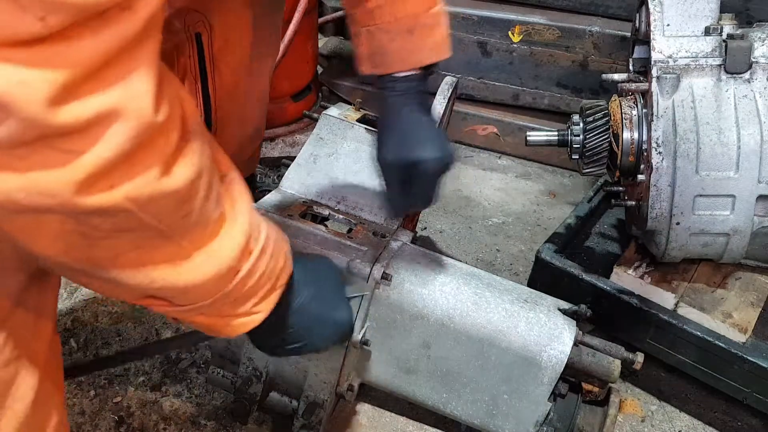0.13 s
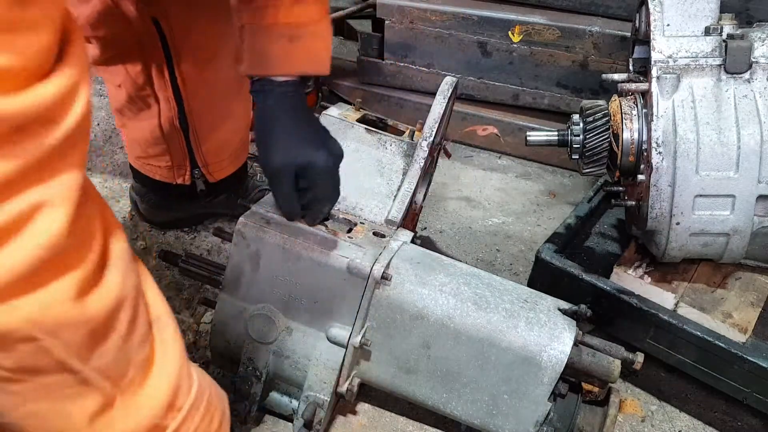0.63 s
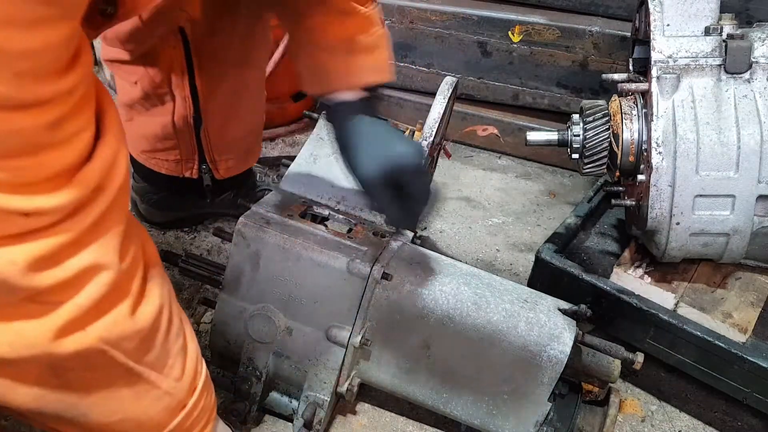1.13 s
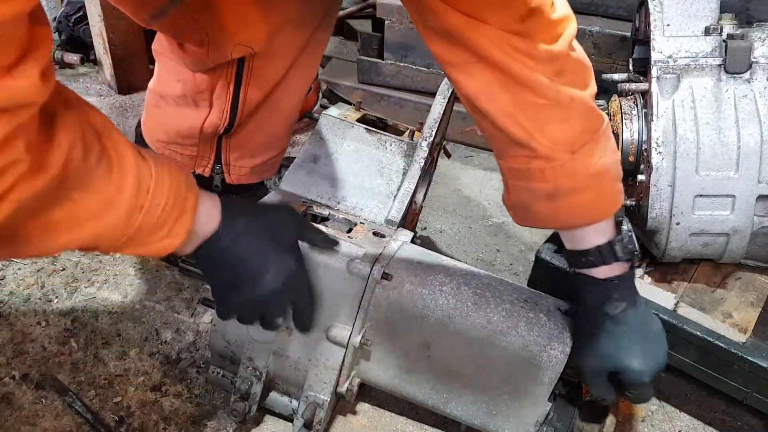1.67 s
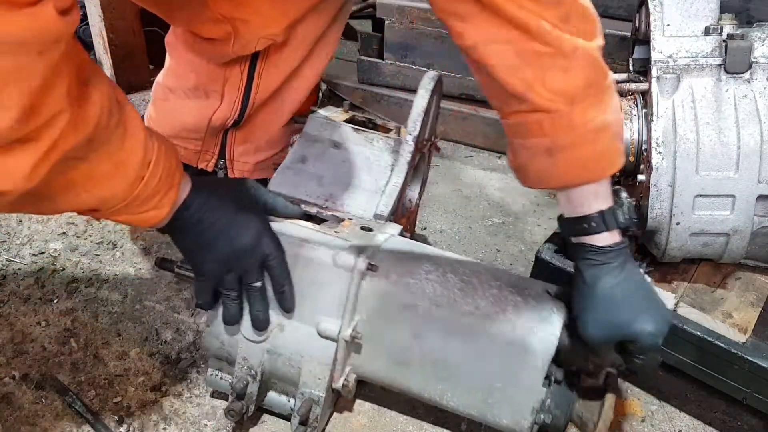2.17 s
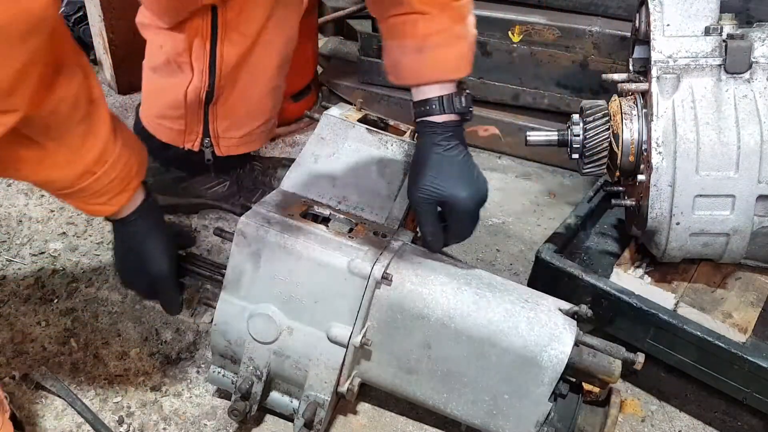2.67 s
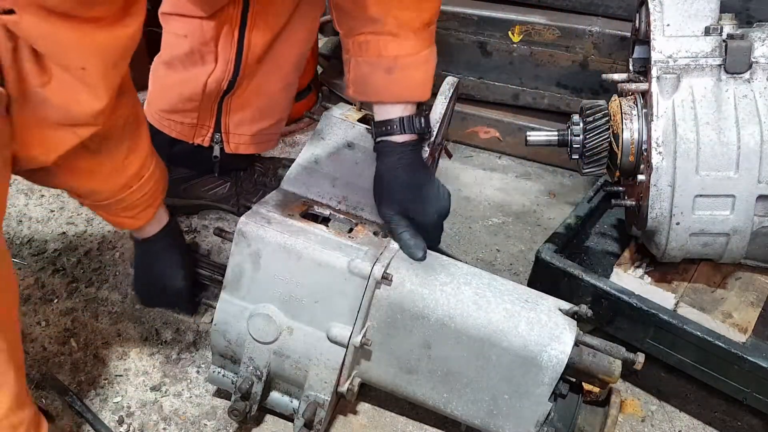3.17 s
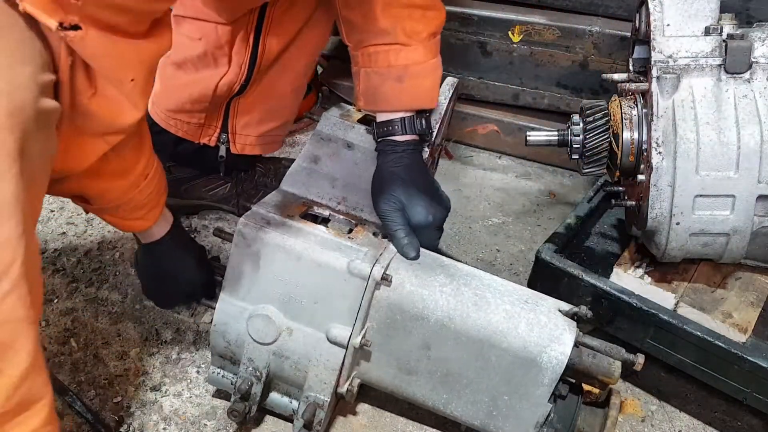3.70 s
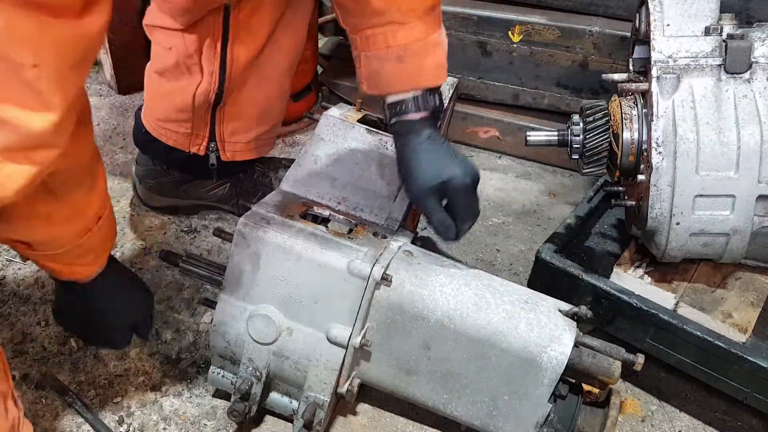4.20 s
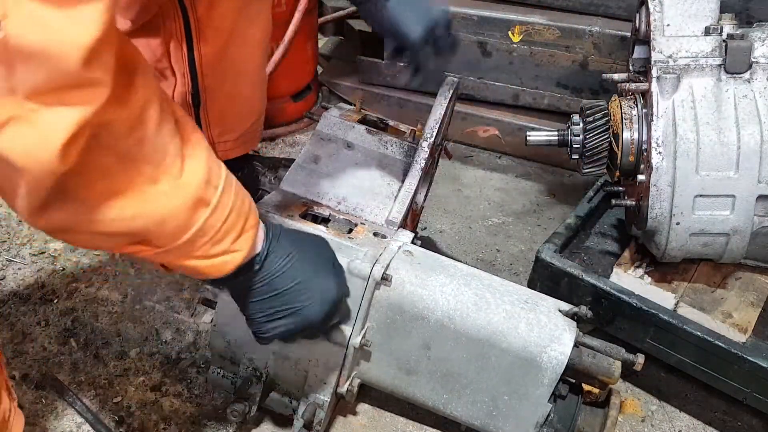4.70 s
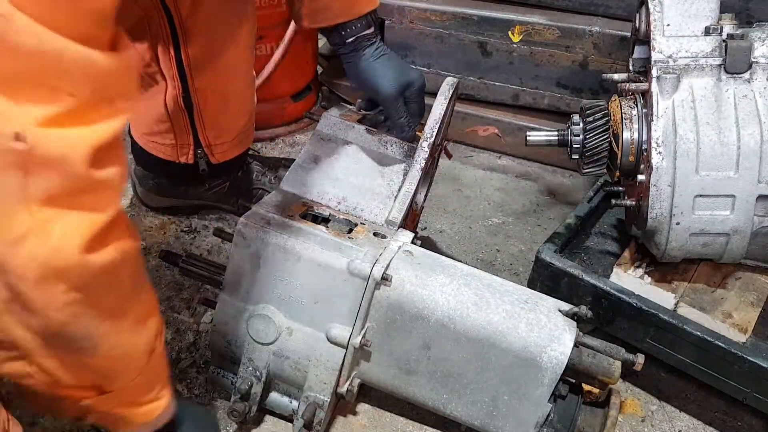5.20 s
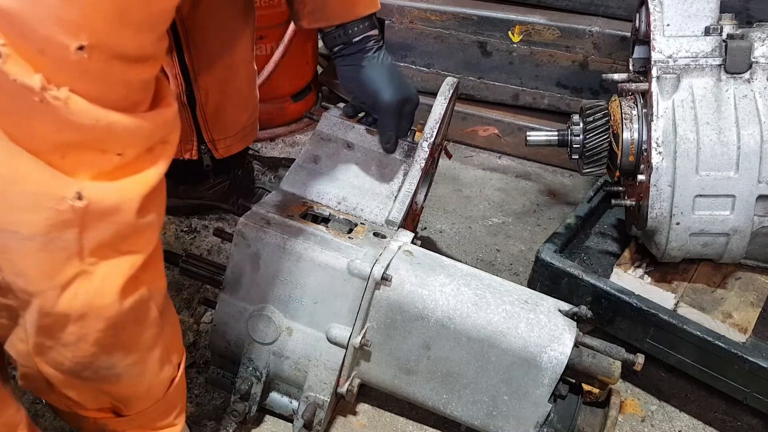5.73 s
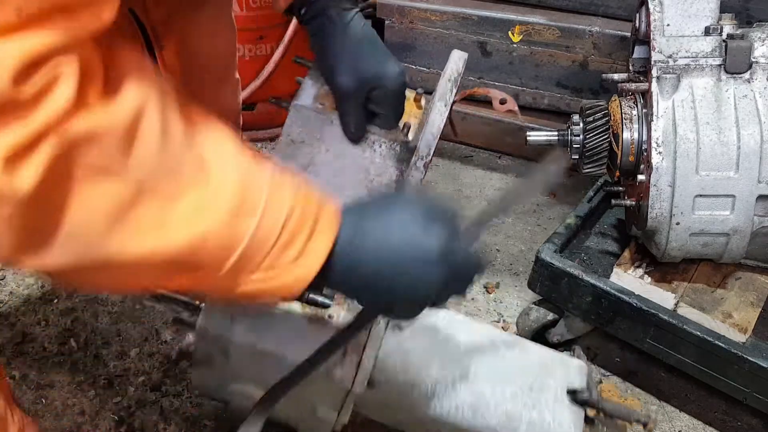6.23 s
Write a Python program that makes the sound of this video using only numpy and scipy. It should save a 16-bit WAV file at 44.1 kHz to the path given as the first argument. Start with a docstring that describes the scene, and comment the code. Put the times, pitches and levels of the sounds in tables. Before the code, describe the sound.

Bright clanking of a bar settling on concrete, followed by deep casing thuds, glove rustle and small ticks, heard close up.

```python
"""A steel pry bar is laid down on a workshop floor, bounces, rolls and rings out; later it is picked up again.
The bar is a bank of sine modes shared out anew at each contact, with noise clicks on top.
A heavy cast casing is tipped and thuds down: damped modes, a push and a noise crack.
Overalls and gloves rustle as grainy noise, small things tick as resonant bursts, a rubbed metal ring is faint,
and filtered noise rumbles low in the workshop, all close to a two-microphone phone."""
import sys
import numpy as np
from scipy import signal
from scipy.fft import rfft, irfft
from scipy.io import wavfile
from scipy.ndimage import uniform_filter1d

SR = 44100
rng = np.random.default_rng(int(sys.argv[2]) if len(sys.argv) > 2 else 0)


def master_out(mix):
    """Clip the mix to full scale and print it as 16-bit PCM to the path in sys.argv[1]."""
    frames = np.transpose(np.atleast_2d(mix))
    ceiling = np.clip(frames, -1, 1)
    pcm = np.round(ceiling * 32767).astype(np.int16)
    wavfile.write(sys.argv[1], SR, pcm)


def amplitude_ratio(level_db):
    """Convert a level in decibels to the matching linear amplitude (field) ratio."""
    exponent = np.asarray(level_db, float) / 20
    return 10 ** exponent


N = 280476
T = np.arange(N) / SR


def colour(points, shape=N):
    """Unit noise with a spectrum drawn through (Hz, dB) points."""
    hz, db = np.transpose(points)
    f = np.fft.rfftfreq(N, 1 / SR) + 1
    gain = amplitude_ratio(np.interp(np.log(f), np.log(hz), db, left=-90, right=-90))
    y = irfft(rfft(rng.standard_normal(shape)) * gain, N)
    return y / y.std()


def diffuse(points):
    """Two-channel noise, nearly alike in the bass and unrelated in the treble."""
    mid, side = colour(points, (2, N))
    alike_hz = 550  # below this both microphones hear much the same
    side = 0.12 * side + signal.lfilter(*signal.butter(1, alike_hz, "high", fs=SR), side)
    return mid + side * np.array([[1], [-1]])


def walk(rate, count=1):
    """Random levels held 1 / rate s and slewed twice; spread near 1."""
    k = int(SR / rate)
    held = np.repeat(rng.standard_normal((count, N // k + 1)), k, axis=1)[:, :N]
    return 1.27 * uniform_filter1d(uniform_filter1d(held, k), k)


def curve(rows, column=1):
    """Gain over time from a table of (s, dB) breakpoints."""
    rows = np.array(rows)
    return amplitude_ratio(np.interp(T, rows[:, 0], rows[:, column]))


def swell(s, length):
    """Gain that rises from time s and falls again within length s, peaking before its middle."""
    skew = 0.77
    return np.sin(np.pi * np.clip((T - s) / length, 0, 1) ** skew) ** 2


def add(out, s, sound):
    """Mix a sound in from time s."""
    i = int(s * SR)
    out[..., i:i + sound.shape[-1]] += sound[..., :N - i]


def bar():
    """Steel bar modes: every contact shares the ring out anew over them, with a knock and a click."""
    # bar modes, plus a faint tone at twice 2295 Hz (4590): f/Hz
    mode_hz = [431, 1174, 1217, 2207, 2295, 3205, 3410, 3811, 4170, 4590, 4670, 4685, 5775, 6110, 7120,
               7187, 7790, 8335, 9658, 10130, 11490, 11670, 12320, 13540, 13990, 14640, 15170]
    # the same modes: level/dB, t60 at damping factor 1/s, gain by place/dB, gain by roll/dB,
    # gain by point contact/dB, left minus right/dB, left leads/rad
    modes = [(-24, 0.25, -19, 14, 7, -1.9, -0.96), (-15, 0.86, -15, 10.5, 2.5, -3.9, 0.37),
             (-17, 0.52, -10, 10.5, -2, -2, -2.6), (-9.5, 0.63, -0.2, 8.5, -3, -3.5, -2),
             (-6.5, 0.75, 28, 11.5, -14, -3, 0.83), (-6.0, 0.2, 0.5, -9.5, -11, 7, -2.5),
             (-3, 0.56, -14, 1, -0.6, 3, -1.05), (-25, 0.44, -6, 19.5, 3.5, 9, -2.3),
             (-7, 0.45, -6.5, -13, -3.5, -7.5, -1), (-33.0, 0.91, 26, 11, -8, -0.5, 0.5),
             (1.5, 0.3, -3, -4, 4.3, 5, 2.1), (-23, 0.91, 26.5, 10.0, -10.5, -0.5, 2.1),
             (-9.5, 0.15, -1, -15, -4, -0.6, 1.44), (-0.5, 0.3, 17.5, -4.5, 5.5, 9, 3),
             (-7.5, 0.14, 2, -6, 2.5, -0.5, -3.5), (-14, 0.39, 4.5, -5, -2, 9, 2),
             (-3.5, 0.24, -5, -4.5, 5.5, 1.5, 2), (-11, 0.56, -8, 1, -1, -5.5, 3.5),
             (-10, 0.44, -6, -3.6, 12.5, -3, -1.5), (-14, 0.3, -1.5, -6, 1.35, 4, -1),
             (-19.5, 0.55, 7.5, 11.5, 3, 0.5, -2.2), (-11, 0.47, -14, 1.5, 15.5, 1.5, -2.74),
             (-14, 0.33, -7.5, 11.5, 14, 6, 3), (-14, 0.28, 3.1, 10, 7.5, 2.5, 1),
             (-13.5, 0.33, -6.5, 8.5, 7, 7, -0.3), (-20, 0.41, -6, 9, 11, 6, 1.66),
             (-26, 0.55, 0, 11.5, 5, 4, -0.16)]
    # the bar strikes the floor or the casing: t/s, level/dB, place along the bar (within -1..1),
    # roll (about -1.2..1), point contact (about -1.1..0.7), damping factor
    bounces = [(0.24, -51, -0.34, 0.15, -0.41, 3.6), (0.8427, -29, -0.17, 0.032, 0.67, 1.46),
               (0.897, -37.5, -0.17, -0.49, 0.53, 1.6), (0.9769, -42.5, -0.16, 0.14, 0.57, 1.36),
               (1.0426, -32.5, -0.38, 0.33, -0.58, 1.2), (1.1174, -24, 0.04, -0.12, -1.04, 0.35),
               (1.1678, -17, -0.23, -0.83, -0.084, 1.26), (1.287, -24, 0.24, -0.55, -0.03, 0.23),
               (5.53, -52, -0.4, 0.4, -0.46, 1.9), (5.602, -56.5, -0.6, 1, -0.78, 2.6),
               (5.627, -46.5, -0.94, 0.78, -0.99, 2.6), (5.664, -50.5, 0.14, -0.015, 0.43, 1.9),
               (5.727, -54, -0.074, -0.36, 0.28, 4.7)]
    # the bar rolls onto a new contact without a blow: t/s, level/dB, place (within -1..1),
    # roll (about -1.2..1), point contact (about -1.1..0.7), damping factor
    rolls = [(1.082, -30, 0.05, 0.41, -1, 1.0), (1.215, -26.5, -0.48, -1.18, -1.05, 1.2),
             (1.245, -16, -0.17, -0.71, -0.15, 2.27), (1.334, -27.5, 0.67, -0.24, 0.39, 0.67),
             (1.42, -40, 0.88, -0.14, 0.3, 1.01), (5.507, -40.5, -0.06, -0.23, 0.46, 0.97)]
    bounce_rise_ms, roll_rise_ms = 0.43, 18  # how fast the new ring takes over
    click_db_by_point = 4  # a point contact clicks brighter than a flat one
    beam_hz, beam_power = 4900, 0.45  # higher modes beam more sharply, so they flutter more

    count = len(modes)
    hz = np.array(mode_hz)[:, None]
    mode_db, t60, *by_contact, pan_db, lead = np.array(modes).T[:, :, None]
    moving = np.zeros(N)
    ring = np.zeros((count, N))
    clicks = np.zeros((2, N))
    contacts = [(*row, bounce_rise_ms) for row in bounces] + [(*row, roll_rise_ms) for row in rolls]
    contacts = sorted(contacts)
    ends = [row[0] for row in contacts[1:]] + [N / SR]
    grit = rng.standard_normal((len(contacts), 2, 1200))
    burst_t = T[:1200]
    for (s, db, *contact, damping, rise_ms), end, noise in zip(contacts, ends, grit):
        a = int(s * SR)
        b = int(min(end + 0.2, s + 1.2) * SR)
        t = T[:min(b, N) - a]
        now = slice(a, a + len(t))
        contact_db = sum(c * g for c, g in zip(contact, by_contact))
        new = amplitude_ratio(db + mode_db + contact_db - 60 * t * damping / t60)
        share = 1 - np.exp(-t / (rise_ms / 1000))
        ring[:, now] = share * new + (1 - share) * ring[:, now]
        # a sharp contact sets the bar rocking; it settles soon after
        moving[now] = 0.31 + np.exp(-rise_ms / 25 - t / 0.14)
        knock = signal.lfilter(*signal.butter(1, [200, 1100], "band", fs=SR), noise[0] + 0.19 * noise)
        add(clicks, s, amplitude_ratio(db - 4.5 - 0.8 * rise_ms - 60 * burst_t / 0.14) * knock)
        click = signal.lfilter(*signal.butter(1, [1500, 9000], "band", fs=SR), noise)
        click_db = db + 4.5 + click_db_by_point * contact[2] - 1.2 * rise_ms
        add(clicks, s, amplitude_ratio(click_db - 60 * burst_t / 0.02) * click)

    # the rolling bar turns its loud directions past the two microphones
    moving = uniform_filter1d(moving, 400) * (hz / beam_hz) ** beam_power
    phase = 2 * np.pi * (hz * T + rng.random((count, 1))) + 0.9 * moving * walk(35, count=count)
    turn = 0.44 * moving * walk(8, count=count)
    left_gain = amplitude_ratio(pan_db / 2 + 3.2 * moving * walk(55, count=count))
    right_gain = amplitude_ratio(-pan_db / 2 + 3.3 * moving * walk(55, count=count))
    left = left_gain * np.sin(phase + lead / 2 + turn)
    right = right_gain * np.sin(phase - lead / 2 - turn)
    return np.array([(ring * left).sum(0), (ring * right).sum(0)]) + clicks


def casing():
    """A push rings the casing; it rocks freely for a moment, then the floor damps it; the contact cracks."""
    # casing on the floor: f/Hz, relative level/dB, t60 at damping factor 1/s
    modes_on_floor = [(61.76, 9.5, 0.88), (101.06, 5.5, 0.22), (113.6, 11.5, .3), (131.5, 4, 0.22),
                      (160, 0.5, 0.17), (217.5, 0.5, 0.18), (252.8, -3, 0.23), (329.3, -5, 0.34),
                      (437.2, -7.5, 0.096), (525, -24, .2), (887, -7, .15), (991, -3, 0.23),
                      (1394, -9.5, 0.12), (1422, -10, 0.11), (1872, -9, 0.18), (2193, -10.5, .15),
                      (2410, -9.5, 0.14)]
    # thuds: t/s, body peak/dB, crack against body/dB, grit against body/dB, damping factor
    thuds = [(0.345, -36.5, -10.5, -3.5, 3.4), (0.377, -41.5, -22, -15, 3.3), (0.477, -44, -12, -12, 4),
             (2.055, -23, -21.5, -52, 3.2), (2.135, -23.5, -20.5, -31.5, 3.2),
             (2.291, -14.5, -23, -19, 2.7), (3.632, -11, -15.5, -27, 4.4), (3.709, -34, -41, -36, 1.8),
             (5.885, -42.5, -25.5, -21.5, 3.4), (6.282, -15, -36, -44.5, 2.5)]
    rock_s = 0.031  # the casing rings freely this long before the floor damps it
    push_ms, push_ms_per_db = 1.2, 0.0564  # a softer contact cracks less and pushes longer
    # the weight comes down over the first moments, so the ring starts this much weaker
    settle_share, settle_s = 0.33, 0.008

    out = np.zeros((2, N))
    t = T[:SR // 2]
    hz, mode_db, t60 = np.array(modes_on_floor).T[:, :, None]
    thin = hz > 700  # wall modes answer the crack, not the soft push
    crack_band = signal.butter(2, [450, 1600], "band", fs=SR, output="sos")
    grit_band = signal.butter(1, [1800, 7000], "band", fs=SR, output="sos")
    noises = rng.standard_normal((len(thuds), 2, 2, len(t)))
    spreads = rng.standard_normal((len(thuds), 2, len(modes_on_floor), 1))
    for (s, db, crack_db, grit_db, damping), (crack, grit), spread in zip(thuds, noises, spreads):
        loaded = 0.11 * t + damping * np.maximum(t - rock_s, 0)  # seconds of decay so far
        phase = 2 * np.pi * hz * t + 0.29 * spread[0] + 0.1 * spread
        modes = amplitude_ratio(mode_db - 60 * loaded / t60) * np.cos(phase)
        push = -np.diff(np.hanning(int((push_ms - push_ms_per_db * crack_db) * SR / 1000)))
        settling = 1 - settle_share * np.exp(-t / settle_s)
        body = signal.lfilter(push, 1, (modes * ~thin).sum(1) * settling)
        wall_gain = amplitude_ratio(crack_db - 5.5 - 60 * t / 0.16) * (1 - np.exp(-t / 0.001))
        walls = wall_gain * (modes * thin).sum(1)
        crack = signal.sosfilt(crack_band, crack[0] + 0.37 * crack)
        grit = signal.sosfilt(grit_band, grit)
        crack_decay = amplitude_ratio(-60 * t / 0.0355) + 0.305 * amplitude_ratio(-60 * t / 0.18)
        contact = amplitude_ratio(crack_db + 10) * crack_decay * crack
        contact += amplitude_ratio(grit_db + 3.5 - 60 * t / 0.12) * (1 - np.exp(-t / 0.0042)) * grit
        add(out, s, amplitude_ratio(db) * (body / abs(body).max() + walls + contact))
    return out


def ticks():
    """Short noise bursts around one resonance each; low knocks ring narrower than high ticks."""
    # small ticks and knocks: t/s, nominal peak/dB, centre f/Hz, t60/s, left minus right/dB
    touches = [(0.165, -48.5, 1890, 0.034, -3), (0.313, -35.5, 7960, 0.034, -2),
               (0.6623, -42.5, 7670, 0.039, -1), (2.3015, -32, 1050, 0.054, -0.5),
               (2.5775, -35, 1324, 0.038, 2), (2.606, -38, 1420, 0.028, 0.0),
               (2.7994, -50.5, 7190, 0.026, 4), (3.421, -44, 8900, 0.0435, -3.5),
               (3.4228, -50.5, 1573, 0.063, -1), (4.6068, -52.5, 9230, 0.036, -0.5),
               (4.7027, -48, 2996, 0.046, 4), (5.4841, -39, 5200, 0.021, -1.5),
               (6.321, -36.5, 1450, 0.045, 2)]
    out = np.zeros((2, N))
    t = T[:SR // 8]
    for (s, db, hz, t60, pan_db), noise in zip(touches, rng.standard_normal((len(touches), 2, len(t)))):
        q = 2.5 * (6000 / hz) ** 0.53
        burst = signal.lfilter(*signal.iirpeak(hz, q, fs=SR), noise[0] + 0.78 * noise)
        snap = 0.5 * amplitude_ratio(-60 * t / 0.012) * np.diff(noise, prepend=0)  # the first touch is bright
        pan = np.array([[pan_db], [-pan_db]]) / 2
        add(out, s, amplitude_ratio(db - 3.0 - 60 * t / t60 + pan) * (burst / burst.std() + snap))
    return out


def rustle():
    """Cloth and glove hiss made of dense small grains, under single swishes of the same grain."""
    # steady hiss before graining: t/s, treble level/dB, middle level/dB
    hiss_levels = [(0.0, -67, -69.5), (0.4, -67, -65.5), (0.7, -63, -74.5), (0.9, -70, -65),
                   (1.55, -66.5, -67), (1.75, -68, -74), (2.11, -68, -71.5), (2.3, -65, -67.5),
                   (2.68, -63.5, -65.5), (2.95, -69.5, -77), (3.25, -71.5, -75.5), (3.45, -77.5, -84),
                   (3.79, -81.5, -88), (3.93, -66.5, -81), (4.3, -74, -75), (5.2, -68.5, -71.5),
                   (5.42, -55.5, -60.5), (5.72, -67.5, -67.5), (6.18, -58, -58.5), (6.36, -68, -63.5)]
    # treble spectrum: f/Hz, density/dB per Hz
    treble_colour = [(1470, -32.5), (2500, -4.5), (2970, -8), (4410, -1.5), (6500, -2), (11300, -3),
                     (15200, -5), (16000, -6.5)]
    # middle spectrum: f/Hz, density/dB per Hz
    middle_colour = [(240, -15.5), (400, -10.5), (1040, -3.5), (1740, -2), (2090, -8), (2280, -5),
                     (3500, -11.5), (4550, -36), (7700, -120)]
    grain = amplitude_ratio(1.12 * walk(130) + 1.7 * walk(28))
    treble = curve(hiss_levels, column=1) * diffuse(treble_colour) * grain
    middle = curve(hiss_levels, column=2) * diffuse(middle_colour) * grain * amplitude_ratio(1.93 * walk(34))
    return treble + middle + swishes(grain)


def swishes(grain):
    """Cloth sliding: quick swell, uneven hiss, slower stop."""
    # single swishes before graining: t/s, length/s, treble level/dB, middle against the treble/dB
    slides = [(0.215, 0.16, -51, -5.5), (0.282, 0.117, -50.5, 1), (0.56, 0.13, -59.5, -6),
              (0.717, 0.07, -53.5, -9), (1.498, 0.18, -49.5, -19.5), (1.769, 0.17, -58.5, -10.5),
              (2.172, 0.15, -55, -19), (2.402, 0.19, -46, -21), (2.569, 0.096, -49.5, 3.5),
              (2.641, 0.11, -54, -15), (2.743, 0.13, -59, -11), (2.89, 0.063, -61, -12),
              (2.96, 0.06, -59.5, -14.5), (2.988, 0.12, -52, -28), (3.096, 0.065, -62, -5.5),
              (3.182, 0.1, -54, -17.5), (3.42, 0.063, -63.5, -14.5), (3.882, 0.093, -58.5, -10.5),
              (3.974, 0.087, -61, -17.5), (4.056, 0.11, -60.5, -6.5), (4.41, 0.098, -48.5, -11),
              (4.459, 0.15, -66, 2.5), (4.581, 0.082, -61, -22), (5.171, 0.18, -61.5, -12),
              (5.298, 0.23, -56, -5), (5.482, 0.094, -45, -3.5), (5.822, 0.094, -60, -9),
              (5.985, 0.11, -51, -17.5), (6.064, 0.23, -52.5, -4)]
    presence_share = 0.44  # presence follows the middle by this share
    pan_db = 1  # the cloth is to the left
    gains = np.zeros((3, N))
    for s, length, treble_db, middle_db in slides:
        a, b = int(s * SR), int((s + length) * SR)
        gain = np.zeros(N)
        gain[a:b] = amplitude_ratio(treble_db) * swell(s, length)[a:b]
        gains += gain * amplitude_ratio(np.array([[0], [presence_share * middle_db], [middle_db]]))
    hiss = 0
    # treble, presence and middle
    for gain, edges in zip(gains, ([6200, 14000], [2430, 5600], [650, 2020])):
        sos = signal.butter(2, edges, "band", fs=SR, output="sos")
        band = signal.sosfilt(sos, rng.standard_normal((2, N)))
        hiss = hiss + gain * band / band.std()
    return hiss * grain * amplitude_ratio(np.array([[pan_db], [-pan_db]]) / 2)


def rubbed_ring():
    """A faint metal ring kept alive by rubbing: noise through narrow resonances, in swells."""
    # rubs: t/s, length/s, level at the height of the swell/dB
    rubs = [(2.623, 0.39, -64), (4.739, 0.1, -66), (5.05, 0.15, -67), (5.3, 0.21, -74.5),
            (5.657, 0.77, -59.5)]
    # resonances: f/Hz, width/Hz, relative gain/dB
    resonances = [(1420, 35, 0.5), (1618, 31, 0.5)]
    noise = rng.standard_normal((2, N))
    ring = sum(amplitude_ratio(db) * signal.lfilter(*signal.iirpeak(hz, hz / width, fs=SR), noise)
               for hz, width, db in resonances)
    gain = sum(amplitude_ratio(db) * swell(s, length) for s, length, db in rubs)
    return gain * ring / ring.std()


def rumble():
    """Workshop rumble and handling: low noise that heaves and flutters."""
    # level before the flutter: t/s, level/dB
    levels = [(0.0, -51), (0.12, -59), (1.11, -51), (1.4, -60), (2.05, -63.5), (2.15, -57), (2.58, -57),
              (3.24, -66), (3.6, -59.5), (3.9, -55), (4.59, -54), (5.45, -54.5), (6.3, -54), (6.36, -48)]
    # spectrum: f/Hz, density/dB per Hz
    spectrum = [(15, -42.5), (25, -14), (38, -1.5), (59, 3), (109, -4.5), (165, -5), (297, -9.5),
                (377, -17.5), (438, -16), (798, -25), (900, -29.5), (1170, -44.5), (1980, -120)]
    return curve(levels) * diffuse(spectrum) * amplitude_ratio(2.1 * walk(13))


def room(dry, wet_db):
    """Dense decaying echoes, longer in the bass and wider in the treble."""
    # reverberation time: f/Hz, t60/s
    reverb = [(60, 0.95), (250, 0.46), (1000, 0.35), (4000, 0.25), (14000, 0.067)]
    t = T[:SR]
    hz, t60 = np.transpose(reverb)
    tail = 0
    for centre in 45 * 2. ** np.arange(8.4):
        sos = signal.butter(2, [centre / 1.41, centre * 1.41], "band", fs=SR, output="sos")
        mid, side = signal.sosfilt(sos, rng.standard_normal((2, SR)))
        decay = np.interp(np.log(centre), np.log(hz), t60)
        both = mid + min(0.16 + centre / 1400, 1) * side * np.array([[1], [-1]])
        tail = tail + both * amplitude_ratio(-60 * t / decay) * (1 - np.exp(-t / 0.0025))
    return dry + amplitude_ratio(wet_db) * signal.fftconvolve(dry, tail, axes=1)[:, :N]


def scene():
    """Bar, casing and ticks sound in the room; cloth, rubbing and rumble are added without echoes."""
    return room(bar(), -35.0) + room(casing() + ticks(), -41) + rustle() + rubbed_ring() + rumble()


def roll_off(x):
    """The treble ends steeply here."""
    return signal.sosfilt(signal.butter(12, 16630, fs=SR, output="sos"), x)


def record(dry):
    """The phone thins the deepest bass, rounds the loudest peaks and cuts the top."""
    thin = signal.sosfilt(signal.butter(2, 40, "high", fs=SR, output="sos"), dry)
    rounded = 0.83 * np.tanh(thin / 0.79)
    cut = signal.sosfilt(signal.ellip(8, 0.2, 70, 15950, fs=SR, output="sos"), rounded)
    return roll_off(cut)


dry = scene()
out = record(dry)
master_out(out)
```